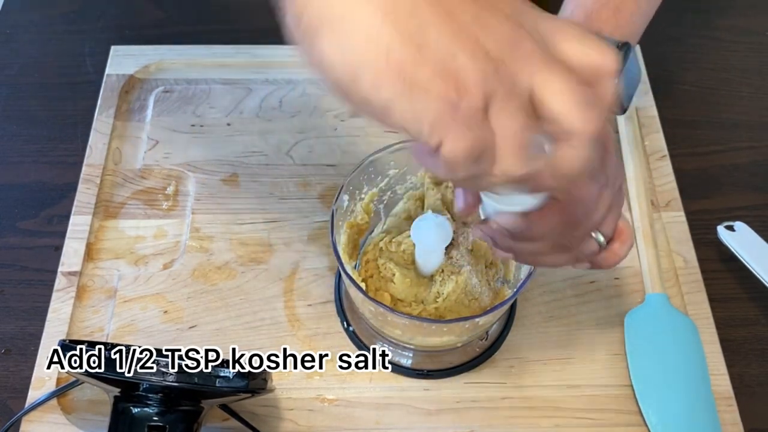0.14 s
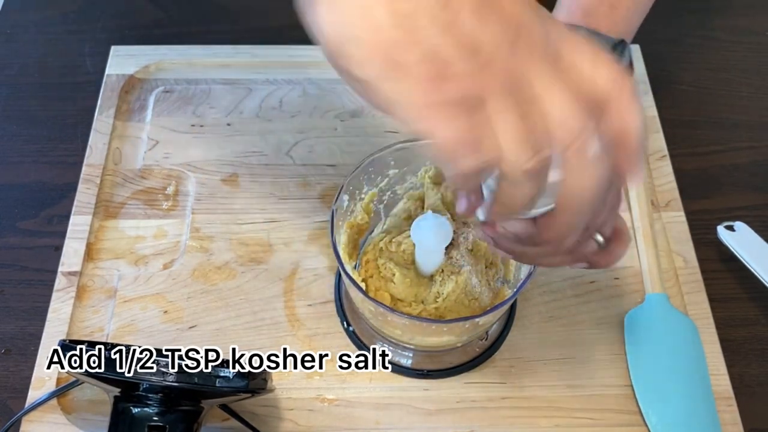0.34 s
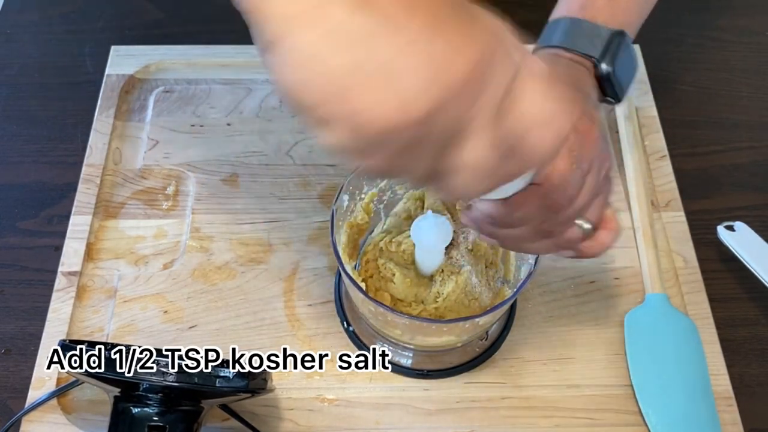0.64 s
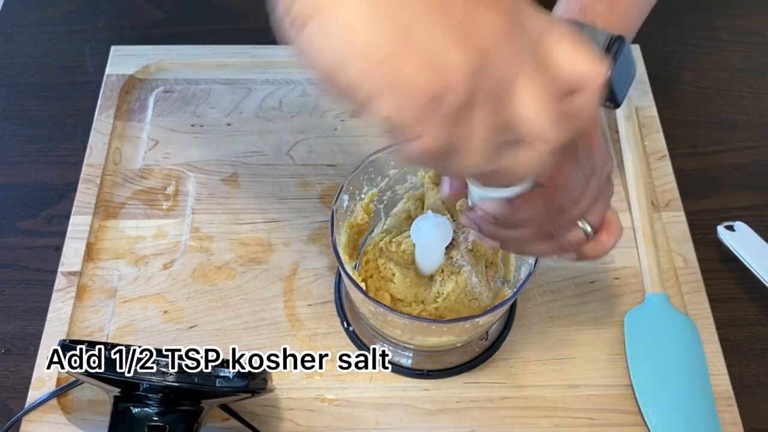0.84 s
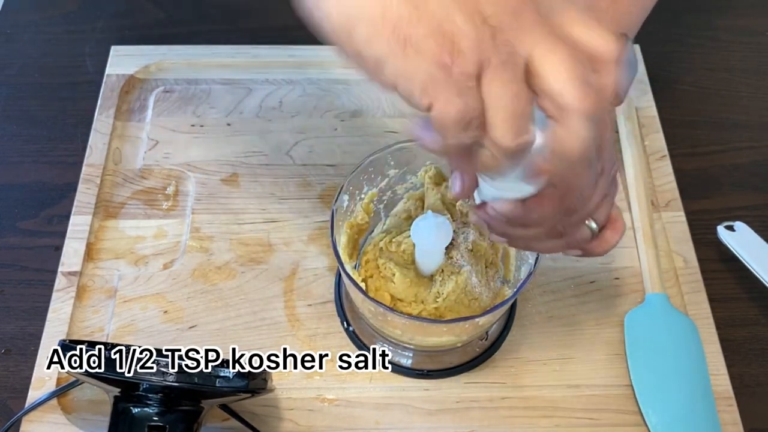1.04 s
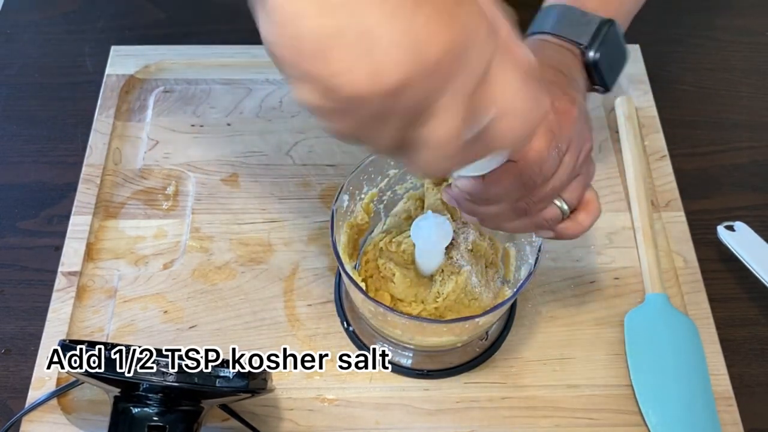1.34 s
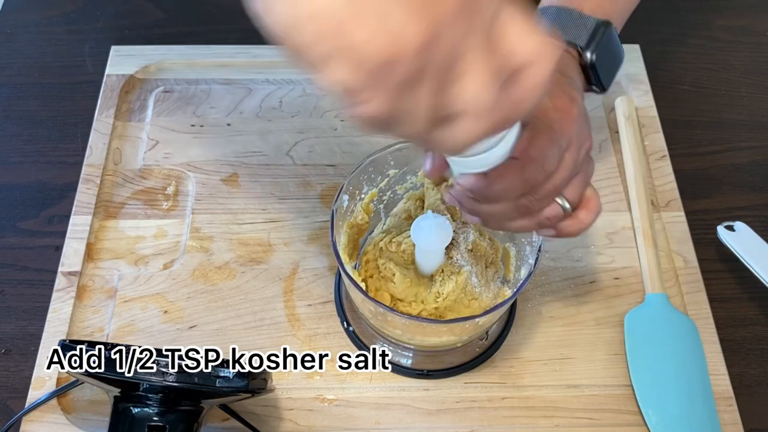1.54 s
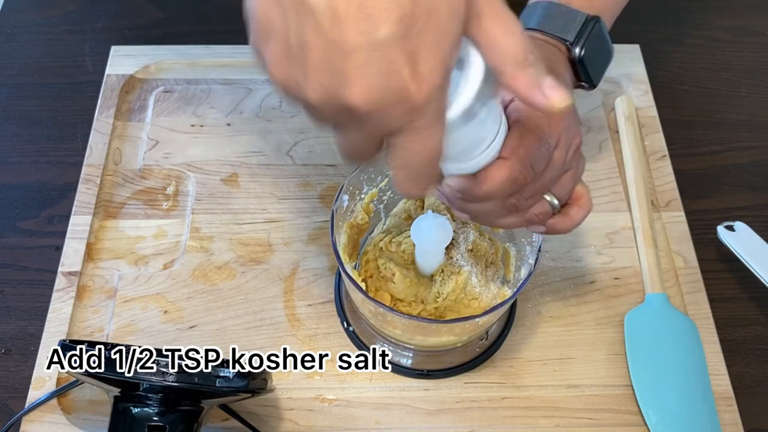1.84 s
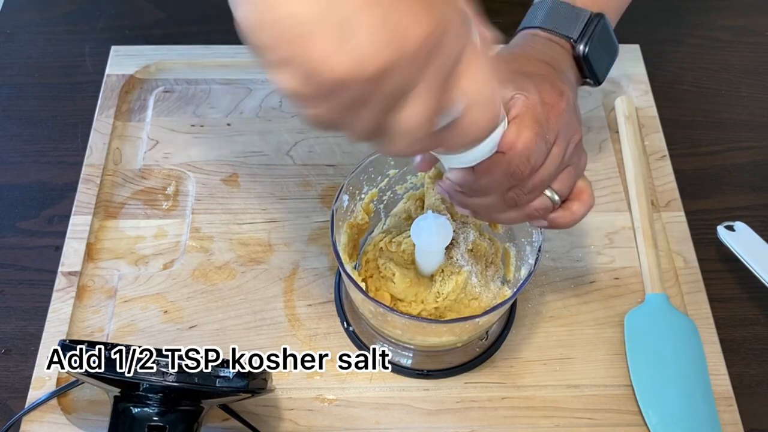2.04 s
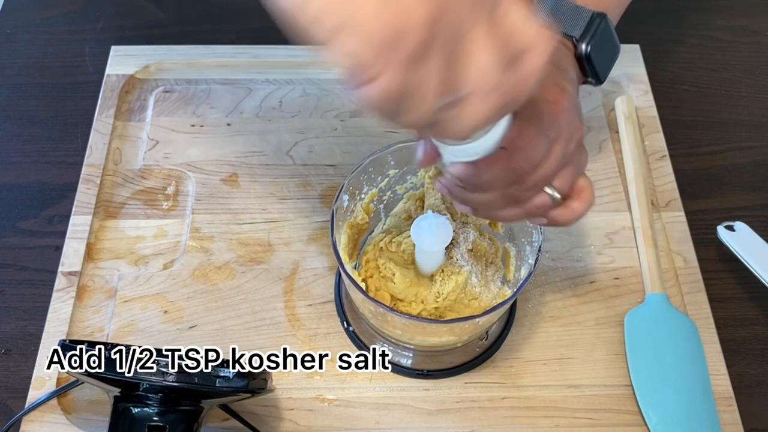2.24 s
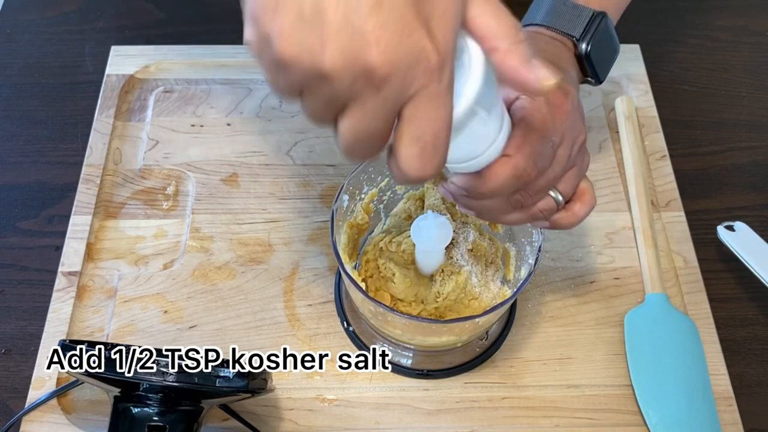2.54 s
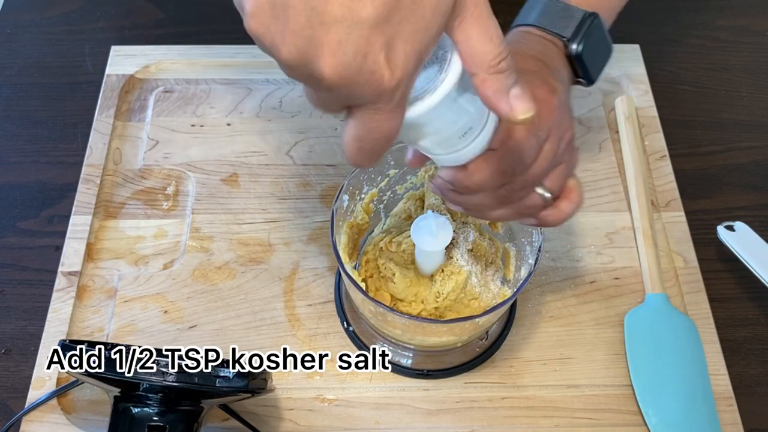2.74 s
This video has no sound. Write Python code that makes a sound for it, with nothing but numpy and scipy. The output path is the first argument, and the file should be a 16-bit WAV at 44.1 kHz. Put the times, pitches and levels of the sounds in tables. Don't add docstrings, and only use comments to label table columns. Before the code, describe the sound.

A hand salt mill crunches rhythmically, close to a phone in a quiet, humming kitchen. An earlier twist dies away at 0 s and a crystal cracks at 0.13; from 0.17 short gritty strokes come about every 0.23 s until 2.75, strongest near 1.1. Bright cracks fall between, sharp at 1.09 and 2.6. The plastic rattles hollowly, hands thud softly, bowl and room ring briefly.

```python
import sys
import numpy as np
from scipy import signal
from scipy.fft import rfft, irfft
from scipy.io import wavfile
from scipy.ndimage import uniform_filter1d

SR = 44100
rng = np.random.default_rng(int(sys.argv[2]) if len(sys.argv) > 2 else 0)


def gain_from_db(level_db):
    decades = np.asarray(level_db, float) / 20
    return 10 ** decades


def put_to_file(sound):
    columns = np.atleast_2d(sound).T
    safe = np.clip(columns, -1, 1)
    whole_steps = np.round(safe * 32767)
    wavfile.write(sys.argv[1], SR, whole_steps.astype(np.int16))


N = 127890


def conv(a, b):
    return signal.fftconvolve(a, b, axes=-1)[..., :N]


def colour(x, points):
    hz, db = np.array(points).T
    f = np.maximum(np.fft.rfftfreq(4096, 1 / SR), 1)
    cepstrum = irfft(np.interp(np.log(f), np.log(hz), db) * np.log(10) / 20)
    cepstrum[1:2048] *= 2
    cepstrum[2049:] = 0
    response = irfft(np.exp(rfft(cepstrum)))
    return conv(x, response.reshape((1,) * (x.ndim - 1) + (-1,)))


def unit(x):
    return x / np.sqrt(np.mean(x ** 2))


def walk(rate):
    hold = int(SR / rate)
    steps = np.repeat(rng.standard_normal(N // 50), hold)[:N]
    return unit(uniform_filter1d(steps, hold))


def peak(x, hz, q):
    return signal.lfilter(*signal.iirpeak(hz, q, fs=SR), x)


# pitch in Hz, level in dB per Hz.
HUM_COLOUR = [(25, -18), (52, 2), (100, -7), (300, -14.5), (600, -14.5), (1000, -9), (4000, -17.5),
              (15000, -17)]


def hum():
    n = rng.standard_normal((3, N))
    air = n[0] + 0.47 * n[1:]
    return gain_from_db(-58 + 2.0 * walk(7.3)) * unit(colour(air, HUM_COLOUR))


# start in seconds, length in seconds, level in dB,
# snap brightness in dB, rise in seconds.
TWISTS = [(0.165, 0.066, -32.5, -4, 0.0038), (0.391, 0.072, -26.5, -7, 0.031),
          (0.604, 0.097, -33.5, -6.5, 0.027), (0.848, 0.073, -32, -5.5, 0.024),
          (1.087, 0.033, -19.5, -9.5, 0.041), (1.311, 0.082, -34, -2.5, 0.027),
          (1.538, 0.057, -30, -6, 0.024), (1.768, 0.088, -31, -6.5, 0.018),
          (2.012, 0.076, -34.5, -3.5, 0.019), (2.245, 0.059, -29, -9.5, 0.029),
          (2.462, 0.043, -33, -3.5, 0.015), (2.673, 0.067, -32.5, -8.5, 0.024)]
# start in seconds, length in seconds,
# level in dB, snap brightness in dB, rise in seconds.
SLIPS = [
    (-.07, 0.084, -36.5, -3.5, .01),
    (0.51, 0.046, -45, -4.5, 0.007),
    (1.074, 0.021, -66, 16, .005),
    (2.417, 0.015, -49.5, -12.5, 0.013),
    (2.654, 0.099, -67, 12, 0.015),
]


def effort():
    lead_s, sag_db_per_s, fall_db_per_s = 0.0077, 108, 432
    t, ring, snap = np.arange(N) / SR, np.zeros(N), np.zeros(N)
    for start, length, db, bright_db, rise in list(TWISTS) + list(SLIPS):
        u = t - start
        sag = sag_db_per_s * np.maximum(u - length / 2, 0)
        fall = fall_db_per_s * np.maximum(u - length, 0)
        build = np.clip((u + lead_s) / max(rise + lead_s, .002), 0, 1) ** 2.05
        pressure = gain_from_db(db - sag - fall) * build
        ring = ring + pressure
        snap = snap + pressure * gain_from_db(bright_db)
    return ring, snap


def mode(x, hz, t60):
    pole = np.exp(2j * np.pi * hz / SR - np.log(1000) / (max(t60, .004) * SR))
    return signal.lfilter([1], [1, -pole], x).imag


# pitch in Hz, level in dB, time to fade by 60 dB in seconds.
BODY = [(574, -42, 0.011), (766, -19, 0.086), (841, -6.5, 0.064), (927, 2.5, 0.034), (1064, 2.5, 0.033),
        (1170, -3, 0.038), (1267, -4.5, 0.028), (1433, -6.5, 0.028), (1539, -1, 0.028), (1614, -12, 0.055),
        (1977, -11.5, 0.037), (2196, -12, 0.02), (2200, -36, 0.012), (2750, -27.5, 0.055)]


def body(hits):
    ringing = 0
    for hz, db, t60 in BODY:
        damping = gain_from_db(1.6 * walk(9))
        share = rng.choice([-1.5, -0.36, 0.096, 0.94], N)
        ringing = ringing + gain_from_db(db) * mode(hits * damping * share, hz, t60)
    return signal.sosfilt(signal.butter(4, 610, 'high', fs=SR, output='sos'), ringing)


# pitch in Hz, level in dB.
CRUNCH = [(300, -36), (1200, 0.5), (2900, 1.5), (3500, -3.5), (4300, 0.5), (6500, -1.5), (10500, -0.5),
          (15500, -10)]


def grinding():
    grains_per_s, spread_db, snap_s = 9000, 2.2, 0.0008
    ring, snap = effort()
    chance = rng.random((2, N))
    size_db = -spread_db * np.log(1 - chance[1])
    lumps_db = 2.0 * walk(190)
    hits = unit((chance[0] < grains_per_s / SR) * gain_from_db(size_db + lumps_db))
    tail = np.exp(-np.arange(200) / (snap_s * SR))
    noise = rng.standard_normal(N)

    def burst(pressure):
        energy = conv((hits * pressure) ** 2, tail ** 2).clip(0)
        return colour(np.sqrt(energy) * noise, CRUNCH)

    steady_rms = np.sqrt(np.mean(burst(np.ones(N)) ** 2))
    body_power = sum(gain_from_db(2 * db) * t60 * SR / (4 * np.log(1000)) for hz, db, t60 in BODY)
    return gain_from_db(-5) / np.sqrt(body_power) * body(hits * ring) + gain_from_db(3.5) * burst(snap) / steady_rms


# start in seconds, peak in dB, body
# ring in dB, snap centre in Hz.
LONE = [(0.1349, -24, -6, 6800), (0.2927, -24, -14, 6800), (0.3506, -38, -28, 11300),
        (0.376, -20.5, -11.5, 5260), (0.748, -25.5, -16, 10600), (0.767, -43, -25, 10500),
        (0.564, -15.5, -43, 11600), (0.6, -23, -15, 6600), (0.7556, -19.5, -19, 10900),
        (0.9584, -17, -36, 10800), (1.0029, -28, -34, 11600), (1.0502, -28.5, -6, 6800),
        (1.0877, -8.5, -39, 5800), (1.1552, -11.5, -28, 7840), (1.217, -28.5, -18, 11200),
        (1.3163, -12.5, -13.5, 6960), (1.6697, -27.5, -20, 6750), (1.7396, -28.5, -6, 7800),
        (1.7502, -34, -21, 6030), (1.9126, -33, -10, 4940), (1.9958, -46, -27, 10500),
        (2.0163, -15, -15, 6940), (2.2426, -25.5, -14, 4940), (2.3536, -32, -1, 4740),
        (2.6035, -8.5, -14.5, 6140), (2.6754, -22, -24, 11600), (2.801, -26.5, -11, 7600)]
# start in seconds, peak in dB, body ring in dB, snap centre in Hz.
BIG = [(0.1707, -27.5, 5.5, 7300), (0.1775, -17, -20, 6740), (0.4065, -29, -14, 5960),
       (0.4105, -32, -10, 4090), (0.1904, -15, 4.5, 6600), (0.2034, -34, 19, 4090),
       (0.4444, -17.5, 4, 10600), (0.4654, -23, 2, 4110), (0.5245, -17.5, -28, 7300),
       (0.529, -17.5, -20, 10400), (0.5394, -16.5, -4, 6460), (0.6154, -33, 18.5, 5970),
       (0.625, -40, -15, 5930), (0.703, -22, -15, 10300), (0.8629, -43, -7, 4200), (0.6394, -13, 7, 7400),
       (0.6694, -20, -36, 4230), (0.8734, -18, 4.5, 5330), (0.9094, -28, 14, 5050),
       (1.1032, -12.5, -11, 6950), (1.0794, -26, -30, 10500), (1.118, -17, -2, 10600),
       (1.381, -36, -13, 6500), (1.5509, -22.5, -11, 4200), (1.1384, -30.5, 16, 6500),
       (1.3624, -18.5, 5.5, 4220), (1.5648, -26.5, 7, 4500), (1.7714, -20, 0, 4460),
       (1.812, -13.5, -17, 6030), (1.8232, -13.5, -0.5, 7550), (1.8627, -20, 0.5, 5200),
       (2.0268, -19.5, 9.5, 4530), (2.0654, -30, 15, 4130), (2.076, -27, -4, 10500),
       (2.0941, -19, -4, 5350), (2.2553, -23, 7, 5300), (2.2657, -19, -9, 4320), (2.318, -31, 2, 10500),
       (2.4713, -24.5, -1, 6000), (2.6868, -20, -22, 11500), (2.2714, -30, 13.5, 4400),
       (2.5024, -19, -2, 5630), (2.5134, -20, 1.5, 4420), (2.7004, -17.5, 2.5, 6500),
       (2.7167, -12.5, -4, 7800)]


def fractures():
    snap_s, rise_s, edge_s, rattle_s = 0.0004, 0.0011, .00018, .004
    creak = gain_from_db(-15)
    out, knocks, k = np.zeros(N + 600), np.zeros(N), np.arange(600)
    break_at = int(rise_s * SR)
    u = k / SR - rise_s
    wide = signal.butter(2, [3600, 16000], 'band', fs=SR)
    for table, stretch in ((LONE, 1), (BIG, 2.4)):
        before = creak * (k / (rise_s * SR)) ** 2 + np.exp(u / edge_s)
        after = np.exp(-u / (stretch * snap_s)) + creak * np.exp(-u / rattle_s)
        env = np.where(u < 0, before, after)
        for s, db, ring_db, hz in table:
            x = rng.standard_normal(len(k)) * env
            x[break_at] += 1.8
            x = peak(x, hz, 2.5) + gain_from_db(-4) * signal.lfilter(*wide, x)
            size = np.sqrt(np.sum(x ** 2) / (np.sqrt(stretch) * snap_s * SR))
            i = int(s * SR)
            out[i:i + len(k)] += gain_from_db(db) * x / size / 2
            knocks[i + break_at] = gain_from_db(db + ring_db - 14) / np.sqrt(stretch)
    return out[:N] + body(knocks)


# start in seconds, peak in dB, pitch in Hz.
THUDS = [(0.173, -46.5, 159), (0.393, -42, 64), (0.439, -49, 242), (0.519, -44, 236), (0.519, -36, 474),
         (0.545, -47, 530), (0.55, -52, 54.6), (0.627, -35, 276), (0.749, -48.5, 268), (0.616, -44, 62),
         (0.66, -38, 300), (1.111, -47.5, 248), (1.561, -55, 158), (2.038, -25, 453), (2.268, -43, 250)]


def grip():
    thud_s = 0.014
    out, t = np.zeros(N), np.arange(N) / SR
    for s, db, hz in THUDS:
        u = np.maximum(t - s, 0) / thud_s
        thud = peak(rng.standard_normal(N), hz, 5.5) * u * np.exp(1 - u)
        out += gain_from_db(min(db - 5.5, -40)) * thud / np.abs(thud).max()
    rumble = unit(peak(rng.standard_normal(N), 350, 1.2))
    return out + gain_from_db(-28.5) * effort()[0] * rumble


# start in seconds, peak in dB.
CLAPS = [
    (0.598, -48),
    (0.832, -44.5),
    (1.294, -48),
    (1.756, -46.5),
    (2.229, -48),
    (2.451, -48.5),
    (2.661, -53),
]


def claps():
    low_hz, drop_hz, fall_s, puff_s = 71.8, 610, 0.008, 0.014
    out, t = np.zeros(N), np.arange(N) / SR
    for s, db in CLAPS:
        u = np.maximum(t - s, 0)
        turns = low_hz * u + drop_hz * fall_s * (1 - np.exp(-u / fall_s))
        out += gain_from_db(db) * np.sin(2 * np.pi * turns) * u / puff_s * np.exp(1 - u / puff_s)
    return out * (.3 + .35 * walk(300))


# band centre in Hz, time to fade by 60 dB in seconds, level in dB.
ROOM = [(310, 0.39, 5), (860, 0.43, 2.5), (1930, 0.47, 1), (4500, 0.3, 4), (9900, 0.27, 1),
        (13800, 0.97, -41)]


def room(x):
    early_s = .005
    t, tail = np.arange(SR // 2) / SR, 0
    for hz, t60, db in ROOM:
        edges = [hz / 1.5, min(hz * 1.4, 19000)]
        sos = signal.butter(2, edges, 'band', fs=SR, output='sos')
        band = signal.sosfilt(sos, rng.standard_normal((8, len(t))))
        build = np.minimum(t / 0.0052, 1)
        tail = tail + gain_from_db(db - 60 * t / t60) * band * build / np.sqrt(t60 * SR / 14)
    early = rng.standard_normal(tail.shape) * np.exp(-t / early_s) * (t > .001)
    early = early / np.sqrt(early_s * SR / 2)
    sway = np.array([walk(25) for _ in range(4)])
    paths = x * sway / np.sqrt(np.sum(sway ** 2, axis=0))
    echoes = conv(np.repeat(paths, 2, axis=0), gain_from_db(-11) * tail + gain_from_db(-10) * early)
    return echoes.reshape(4, 2, N).sum(axis=0)


def bowl(x):
    return gain_from_db(7) * peak(x, 2145, 14)


def scene():
    air = hum()
    mill = grinding() + fractures()
    hands = grip() + claps()
    wet = room(mill + 0.6 * hands)
    wet = wet + 0.14 * wet[::-1]
    return mill + hands + wet + bowl(wet) + air


def top_cut(x):
    return signal.sosfilt(signal.butter(12, 16990, fs=SR, output="sos"), x)


def record(dry):
    f = np.fft.rfftfreq(N, 1 / SR)
    left, right = rfft(dry)
    width = gain_from_db(-1) * (0.83 + 0.47 * f / (f + 195)) / (1 + (f / 5860) ** 8)
    mid = (left + right) / 2
    side = (left - right) / 2 * (width + .22)
    lean = gain_from_db(.45 / (1 + (f / 5050) ** 4))
    lag = 2 * np.pi * np.maximum(f - 6800, 0) / 4400
    turn = np.exp(1j * (lag - .44 * np.sin(2 * lag)))
    top = (.07 + 1 / (1 + (f / 15800) ** 250)) / (1 + (f / 16600) ** 100)
    low_cut = 1 / (1 + (24 / (f + 1)) ** 3)
    ports = np.array([(mid + side) * lean, (mid - side) * turn / lean])
    return top_cut(irfft(ports * top * low_cut, N))


dry = scene()
out = record(dry)
put_to_file(out)
```